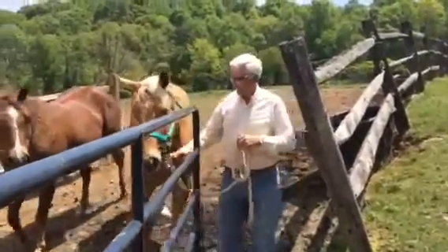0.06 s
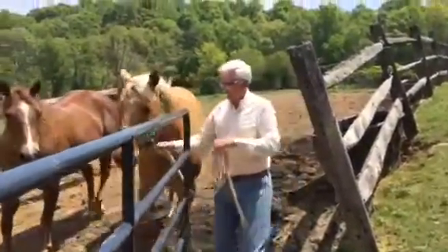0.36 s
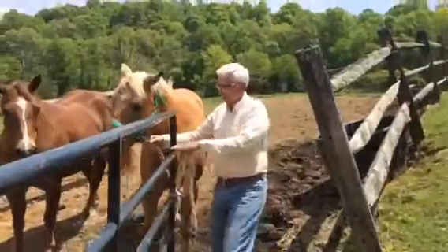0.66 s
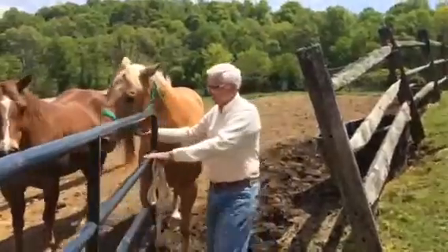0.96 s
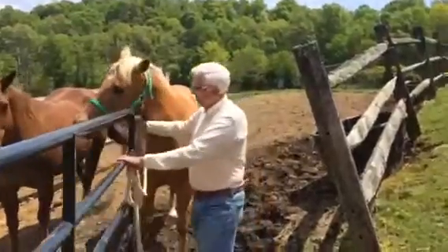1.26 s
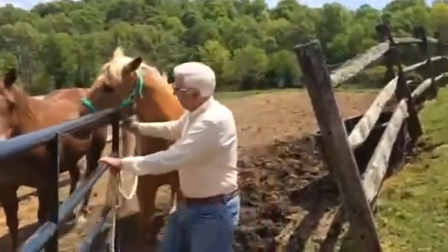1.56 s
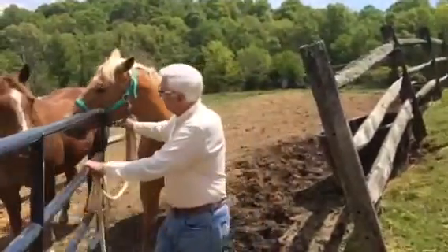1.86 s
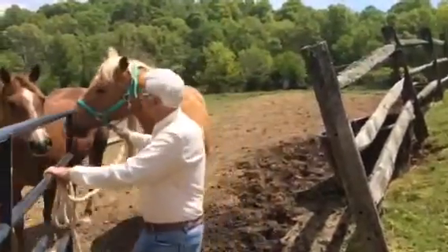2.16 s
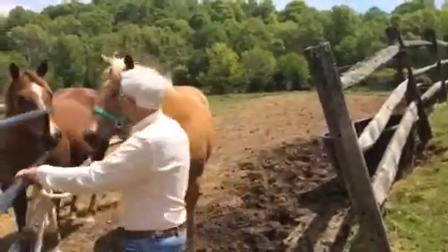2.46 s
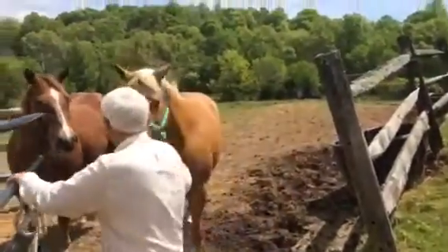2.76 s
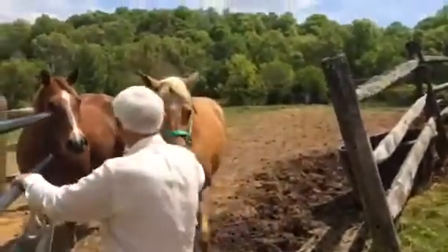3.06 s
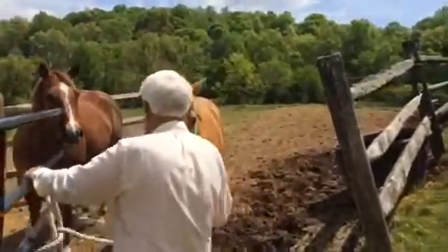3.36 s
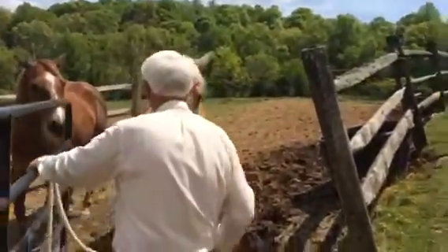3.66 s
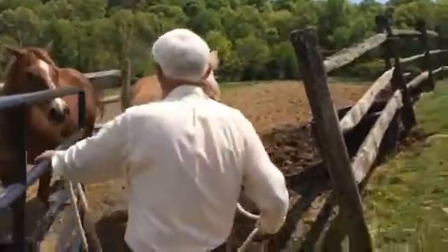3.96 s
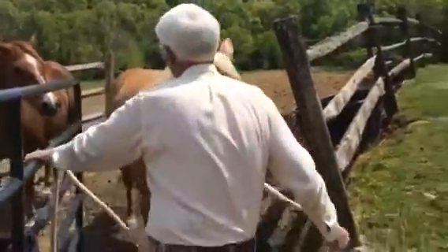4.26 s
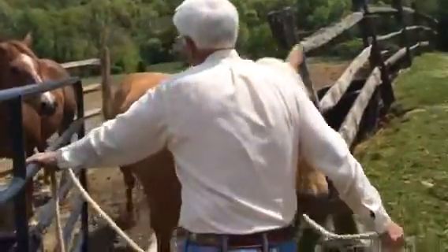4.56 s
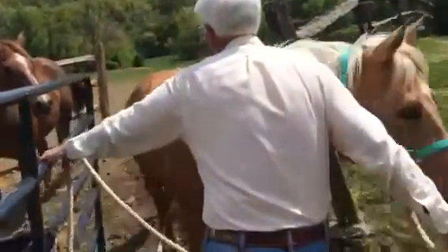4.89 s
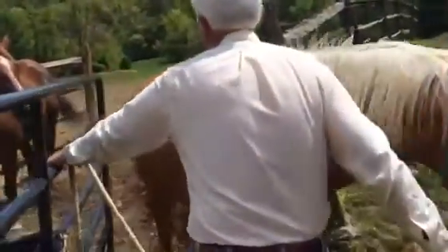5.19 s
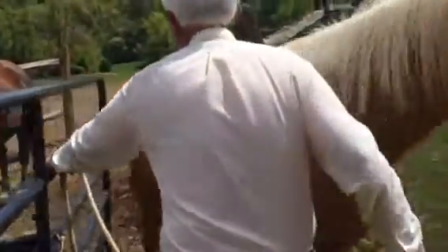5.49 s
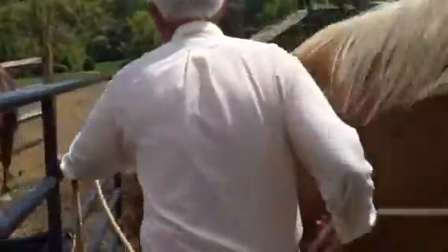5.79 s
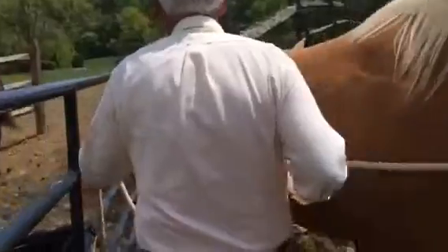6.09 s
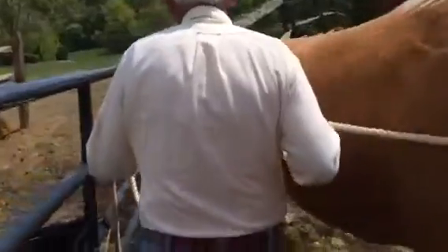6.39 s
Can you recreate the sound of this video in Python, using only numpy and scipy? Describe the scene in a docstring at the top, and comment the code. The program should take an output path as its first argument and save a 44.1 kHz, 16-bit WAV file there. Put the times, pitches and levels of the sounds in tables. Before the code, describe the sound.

A steel tube farm gate is handled close to the microphone in an open paddock. Thin chain clinks at the very start lead into a cluster of loud clangs from 0.3 to 0.5 seconds, each chattering briefly and leaving a hollow ring. Another cluster comes between 1.2 and 1.6 seconds, with a strong hit at 1.4. A sharp clang at 2.5 seconds starts a run of lighter knocks and rattles lasting until about 3.8. A double knock lands at 4.8, followed by small taps and ticks, then more clangs around 5.8 and light knocks near 6.2. Wind rumbles on the microphone over a soft field hiss, gusting around 0.2 and 1.2 seconds and easing later. Faint, dull hoof steps on dirt fall between 2 and 5.5 seconds. A distant bird whistles very faintly around 1 second, from 3.5 to 4.5, and at the end.

```python
"""Open paddock: a steel tube farm gate, swung by hand, knocks against its chain and fittings.
Each knock chatters briefly and rings the tubes: a dense crash, bands of wall modes, long frame tones.
Chain links clink, fittings tick, a far bird whistles and horses step softly on dirt.
Wind rumbles on the microphone over the rush and hiss of the field."""
import sys
import numpy as np
from scipy import signal
from scipy.fft import rfft, irfft
from scipy.io import wavfile

SR = 44100
rng = np.random.default_rng(int(sys.argv[2]) if len(sys.argv) > 2 else 0)


def write(x):
    x = np.atleast_2d(x).T
    wavfile.write(sys.argv[1], SR, np.round(np.clip(x, -1, 1) * 32767).astype(np.int16))


N = 292383
TIME_S = np.arange(N) / SR
CUTOFF_HZ = 15500

# breeze strength: time_s, level_db
BREEZE_LEVEL = [(0, -47.5), (.7, -52), (1.6, -43.5), (2.1, -49.5), (2.9, -47.5), (4.1, -51), (5.1, -55.5),
                (6.0, -58), (6.63, -62.5)]
# gusts on top of the breeze: crest_s, length_s, level_db
WIND_GUSTS = [(0.21, 0.16, -38.5), (0.968, 0.19, -41.5), (1.238, 0.33, -36), (3.994, 0.22, -48.5),
              (5.878, 0.5, -51.5)]
# wind rumble spectrum: freq_hz, density_db
RUMBLE_SPECTRUM = [(10, -48), (25, -19), (50, -0.5), (80, 4.5), (105, -1.5), (125, 5.5), (160, -5),
                   (210, -10.5), (320, -22), (600, -36), (1500, -89.5)]
# field rush spectrum: freq_hz, density_db
RUSH_SPECTRUM = [(200, 16), (400, 10.5), (800, 6.5), (1500, 6), (3000, 1), (5000, -8)]
# high hiss spectrum: freq_hz, density_db
HISS_SPECTRUM = [(1500, -9), (3000, -1.5), (4500, -1), (7000, 1.5), (10000, 3), (13000, 1.5), (15500, 1.5)]
# hiss strength: time_s, level_db
HISS_ENVELOPE = [(0, -49.5), (.7, -89), (1.05, -61), (1.8, -61), (2.3, -56.5), (3.5, -75), (4.1, -63.5),
                 (4.6, -58), (4.85, -60.5), (5.35, -57.5), (6.15, -68.5), (6.63, -70)]
# prominent frame tones: pitch_hz, level_db, t60_s
FRAME_MODES = [(254.4, -35, 4.4), (388.6, -35, 3.15), (562, -27.5, 2.2), (637.5, -24.5, 1.75),
               (719, -35.5, 1.5), (1000, -23, 2.6), (1054, -20.5, 2.6), (1095, -26.5, 2.1),
               (1130, -40, 1.4), (1113, -25.5, 2.2), (1186, -21, 2.1), (1350, -29, 2.6), (1425, -16, 1.38),
               (1591, -11, 0.92), (1676, -10, 0.61), (1768, -14, 0.63), (1875, -21.5, 0.36),
               (2004, -21, 0.67), (2155, -18, 0.37), (2258, -13, 0.79), (2410, -8, 0.17), (2613, -10, 0.26),
               (2920, -22.5, 1.46), (2987, -13.5, 0.5), (2940, -37, 0.41), (3400, -15, 0.3),
               (3366, -12.5, 0.38), (3400, -20.5, 0.26), (3430, -16, 0.23), (3583, -9, 0.41)]
# tube wall flexing in 2, 3, 4 .. lobes, one band each: lowest_hz, level_db, t60_s
WALL_BANDS = [(1047, -15.5, 2.7), (2929, -4, 0.93), (5560, -5.5, 0.57), (9190, -13.5, 0.31),
              (12100, -25, 0.19)]
# crash spectrum of all welded parts: freq_hz, density_db
CRASH_SPECTRUM = [(150, -18), (260, 0), (430, -11), (620, -5), (820, -1.5), (1100, 6), (1600, 9.5),
                  (2600, 5.5), (4300, 6), (7000, 1), (10000, -26.5), (12500, -16.5), (15500, -4.5)]
# crash decay: freq_hz, t60_s
CRASH_DECAY = [(200, 0.62), (600, 0.64), (1500, 0.41), (3500, 0.37), (6000, 0.2), (10000, 0.41),
               (15000, 0.084)]
# knocks on the gate: start_s, level_db, treble_db, contact_hz, chatter_s
GATE_KNOCKS = [(.252, -20, 6, 5900, 0.0091), (0.329, -21, 4, 5800, 0.0095), (.363, -17, 3.5, 2820, .024),
               (.495, -23.5, 2, 3129, .005), (1.246, -32.5, 5, 1910, 0.0089),
               (1.268, -30.5, 4, 3860, 0.022), (1.356, -40, 9, 3250, .011), (1.419, -34.5, -9, 2260, 0.013),
               (1.428, -16, 4, 2140, 0.017), (1.474, -32, 16, 4480, 0.016), (1.571, -27, 7, 6460, .01),
               (2.446, -32, -1, 6650, 0.007), (2.48, -25.5, 7, 3550, .011), (2.508, -16.5, 1.5, 1440, .009),
               (2.737, -37.5, -2, 3146, 0.018), (2.826, -25, 5, 3300, 0.037),
               (2.931, -24.5, 1.5, 1610, .011), (3.001, -31, 2.5, 3000, 0.011),
               (3.101, -34.5, 1, 2970, 0.015), (3.158, -25, 4.5, 6600, 0.0074), (3.213, -28, 6, 3560, .014),
               (3.261, -32, 7.5, 5960, .012), (3.327, -39, 6, 1720, .015), (3.637, -33, 4, 2350, .012),
               (3.826, -26, 9.5, 2950, 0.013), (4.837, -23.5, 0, 1900, 0.014),
               (4.849, -21.5, 6.5, 3270, 0.027), (5.027, -41, -2.5, 6400, 0.01),
               (5.07, -45, -5, 6450, 0.02), (5.13, -42, 4, 3960, 0.01), (5.141, -30.5, 3.5, 4740, 0.013),
               (5.772, -24, 5, 3150, 0.0079), (5.795, -22, 2, 3160, .021), (5.864, -19, -3, 1930, 0.018),
               (6.013, -37, 4, 3050, 0.006), (6.231, -31.5, 2, 3270, .017), (6.309, -41, 8, 3420, 0.019)]
# chain link modes, close pairs beat: pitch_hz, level_db, t60_s
LINK_MODES = [(9000, -10, 0.043), (11760, -14.5, .25), (12300, -2.5, 0.47), (12100, -11, 0.33),
              (13404, -0.5, .25), (13432, -15, 0.3), (14450, -6, 0.24), (14900, -17, 0.19)]
# link clinks: start_s, level_db
LINK_CLINKS = [(0.026, -44), (.168, -29.5)]
# ticks and scuffs of latch, rope and halter: start_s, level_db, resonance_hz, t60_s
FITTING_TICKS = [(.024, -19.5, 11900, 0.018), (0.169, -32, 11700, 0.022), (2.204, -35, 7100, 0.014),
                 (2.312, -53, 2050, 0.03), (2.78, -36, 4940, 0.051), (3.601, -39, 4500, 0.015),
                 (4.744, -46.5, 3020, 0.095), (5.374, -37.5, 6700, 0.056), (5.647, -40, 5600, 0.016),
                 (5.708, -30.5, 5340, 0.021), (5.748, -32, 4470, 0.025)]
# far bird: start_s, length_s, start_hz, end_hz, level_db
BIRD_WHISTLES = [(0.750, 0.095, 2490, 2980, -60), (0.936, .12, 1970, 2200, -61),
                 (3.5, 0.118, 2420, 2700, -63), (4.085, 0.075, 2520, 2710, -58),
                 (4.153, 0.19, 2420, 2660, -62), (4.43, 0.07, 2600, 2280, -68),
                 (4.515, 0.085, 2310, 2590, -59), (6.461, 0.05, 2520, 2730, -58)]
# hoof falls on dirt: start_s, level_db, resonance_hz
HOOF_FALLS = [(2.128, -60, 600), (2.272, -50.5, 694), (2.755, -37, 700), (4.264, -49, 255),
              (4.525, -49.5, 640), (4.765, -50.5, 457), (5.376, -44.5, 910)]


def from_db(db):
    """Decibels to gain."""
    return 10 ** (np.asarray(db) / 20)


def unit_rms(x):
    """Scale to rms 1."""
    return x / np.sqrt(np.mean(x ** 2) + 1e-20)


def in_time(curve):
    """Read a curve at every sample."""
    return np.interp(TIME_S, *np.transpose(curve))


def at_hz(curve, hz):
    """Read a curve along log frequency."""
    freq_hz, value = np.transpose(curve)
    return np.interp(np.log(np.maximum(hz, 1)), np.log(freq_hz), value)


def add(out, start_s, sound):
    """Mix in at start_s, which may be negative."""
    start = round(start_s * SR)
    part = sound[max(-start, 0):max(N - start, 0)]
    out[max(start, 0):max(start, 0) + len(part)] += part


def decay(t60_s, samples):
    """Envelope falling 60 dB in t60_s."""
    return np.exp(-np.log(1000) * np.arange(samples) / SR / t60_s)


def swell(sound, rise_s):
    """Soften the onset, time constant rise_s."""
    return sound * (1 - np.exp(-np.arange(len(sound)) / SR / rise_s))


def noise(spectrum):
    """Coloured noise, rms 1."""
    hz = np.arange(N // 2 + 1) * SR / N
    white = rfft(rng.standard_normal(N))
    return unit_rms(irfft(white * from_db(at_hz(spectrum, hz)), N))


def eddies(rate_hz, step=40):
    """Slow random swing of turbulent air, rms 1."""
    pole = np.exp(-2 * np.pi * rate_hz * step / SR)
    points = N // step + 1
    slow = signal.lfilter([1], [1, -2 * pole, pole * pole], rng.standard_normal(2 * points))[points:]
    return np.interp(np.arange(N) / step, np.arange(points), unit_rms(slow))


def air(eddy_db=3, eddy_hz=13, rush_db=-60, rush_follow=0.083):
    """Breeze and gusts rumble on the microphone, shaken by eddies, over a soft rush and hiss."""
    breeze_db = in_time(BREEZE_LEVEL)
    wind = from_db(breeze_db)
    for crest_s, length_s, level_db in WIND_GUSTS:
        add(wind, crest_s - length_s / 2, from_db(level_db) * np.hanning(int(length_s * SR)))
    rumble = wind * from_db(eddy_db * eddies(eddy_hz)) * noise(RUMBLE_SPECTRUM)
    rush = from_db(rush_db + rush_follow * (breeze_db - breeze_db.mean())) * noise(RUSH_SPECTRUM)
    hiss = from_db(in_time(HISS_ENVELOPE)) * noise(HISS_SPECTRUM)
    return rumble + rush + hiss


def resonator(hz, t60_s, size=330):
    """Damped modes: returns a function from complex strengths to size * size samples of ringing."""
    pole = (2j * np.pi * hz - np.log(1000) / t60_s) / SR
    steps = np.arange(size)
    # damped sine = state at block start * course within the block
    course = np.exp(np.outer(pole, steps)).astype(np.complex64)
    state = np.exp(np.outer(steps * size, pole))
    return lambda strength: ((state * strength + 1e-15).astype(np.complex64) @ course).imag.ravel()


def tube_modes(spread=0.4, crowding=1.35, fall_db=14, damping=0.98, count=56):
    """Frame tones, plus wall modes that thin out and die sooner up each band: hz, gain, t60_s."""
    hz, db, t60_s = np.transpose(FRAME_MODES)
    modes = [(hz, from_db(db), t60_s)]
    for lowest_hz, level_db, longest_s in WALL_BANDS:
        position = ((np.arange(count) + rng.random(count)) / count) ** crowding
        shape = unit_rms(from_db(-fall_db * position)) / np.sqrt(count)
        width_hz = spread * np.sqrt(lowest_hz * WALL_BANDS[1][0])
        wall_t60_s = longest_s / (1 + damping * position)
        modes.append((lowest_hz + width_hz * position, from_db(level_db) * shape, wall_t60_s))
    return np.hstack(modes)


def crash_modes(level_db=3, scatter=0.077, count=1500):
    """Short, unevenly spaced modes of the welded parts, too dense to tell apart: hz, gain, t60_s."""
    hz = np.linspace(np.sqrt(CRASH_SPECTRUM[0][0]), np.sqrt(CUTOFF_HZ), count) ** 2
    spacing_hz = np.gradient(hz)
    hz = hz + spacing_hz * rng.uniform(-0.46, 0.45, count)
    shape = unit_rms(from_db(at_hz(CRASH_SPECTRUM, hz)) * np.sqrt(spacing_hz)) / np.sqrt(count)
    t60_s = at_hz(CRASH_DECAY, hz) * np.exp(scatter * rng.standard_normal(count))
    return hz, from_db(level_db) * shape, t60_s


def blow(hz, bass_db, treble_db, contact_hz, contact_db, width_octaves=0.2, spot_db=1.5):
    """Complex mode strengths: each knock lands on another spot and shares its force differently."""
    colour_db = at_hz([(1400, bass_db), (3800, 0), (9000, treble_db)], hz)
    colour_db += contact_db * np.exp(-0.5 * (np.log2(hz / contact_hz) / width_octaves) ** 2)
    colour_db += spot_db * rng.standard_normal(len(hz))
    return from_db(colour_db) * np.exp(2j * np.pi * rng.random(len(hz)))


def crack(centre_hz, t60_s, samples=8192):
    """Decaying contact noise around one octave-wide resonance."""
    band_hz = np.clip([centre_hz / np.sqrt(2), centre_hz * np.sqrt(2)], 20, SR / 2 - 1000)
    bandpass = signal.butter(2, band_hz, "band", fs=SR, output="sos")
    burst = signal.sosfilt(bandpass, rng.standard_normal(samples))
    return unit_rms(burst) * decay(t60_s, samples)


def chatter(length_s, bounce=0.51, count=14):
    """One contact and its ever weaker rebounds, unit energy."""
    position = (np.arange(count) + rng.random(count)) / count
    samples = max(int(length_s * SR), 2)
    contacts = np.zeros(samples + 1)
    contacts[(position * samples).astype(int)] = bounce * np.exp(-position) * rng.choice([-1, 1], count)
    contacts[0] = 1
    return contacts / np.linalg.norm(contacts)


def gate(ring_db=-4, crack_db=-5, rattle_db=-10, grip_from_s=1.0, grip_db_per_s=13, linger_age_s=0.5):
    """Each knock gives a long ring, a dense crash and a crack, and rattles the loose chain links."""
    tube_hz, tube_gain, tube_t60_s = tube_modes()
    crash_hz, crash_gain, crash_t60_s = crash_modes()
    tubes = resonator(tube_hz, tube_t60_s)
    crash = resonator(crash_hz, crash_t60_s, size=150)
    out = np.zeros(N)
    # tubes still ringing from an earlier swing
    earlier_blow = blow(tube_hz, bass_db=-8, treble_db=31, contact_hz=WALL_BANDS[0][0], contact_db=4.5)
    add(out, -linger_age_s, from_db(-1) * tubes(tube_gain * earlier_blow))
    for start_s, level_db, treble_db, contact_hz, chatter_s in GATE_KNOCKS:
        bass_db = -2.5 - 0.13 * (level_db + 25)  # harder knock: shorter contact, less bass
        contact_db = 4.5 - np.log2(contact_hz / 3200)  # heavy parts resonate lower and stand out more
        colour = bass_db, treble_db, contact_hz, contact_db
        clang = from_db(ring_db) * tubes(tube_gain * blow(tube_hz, *colour))
        if start_s > grip_from_s:  # a hand on the rail damps the long tones
            clang *= from_db(-grip_db_per_s * TIME_S[:len(clang)])
        add(clang, 0, crash(crash_gain * blow(crash_hz, *colour)))
        add(clang, 0, from_db(crack_db + treble_db) * crack(centre_hz=7500, t60_s=0.14))
        clang = swell(clang, rise_s=0.0009)  # the blow spreads along the tubes
        add(out, start_s, from_db(level_db) * signal.oaconvolve(clang, chatter(chatter_s)))
        link_hit = crack(centre_hz=11000, t60_s=0.061)
        rattle = signal.fftconvolve(link_hit, chatter(length_s=0.079, count=5))
        add(out, start_s, from_db(level_db + rattle_db) * rattle)
    return out


def chain_and_fittings(rise_share=0.1):
    """Small links ring high and thin; fittings only tick, and longer scuffs start more softly."""
    hz, mode_db, link_t60_s = np.transpose(LINK_MODES)
    link = resonator(hz, link_t60_s)
    out = np.zeros(N)
    for start_s, level_db in LINK_CLINKS:
        add(out, start_s, link(from_db(mode_db + level_db)))
    for start_s, level_db, resonance_hz, t60_s in FITTING_TICKS:
        add(out, start_s, from_db(level_db) * swell(crack(resonance_hz, t60_s), rise_share * t60_s))
    return out


def bird(echo_t60_s=0.47, echo_samples=8192):
    """Gliding whistles, smeared by echoes from the trees."""
    out = np.zeros(N)
    for start_s, length_s, start_hz, end_hz, level_db in BIRD_WHISTLES:
        pitch_hz = np.linspace(start_hz, end_hz, int(length_s * SR))
        tone = np.sin(2 * np.pi * np.cumsum(pitch_hz) / SR)
        add(out, start_s, from_db(level_db) * np.hanning(len(tone)) * tone)
    echoes = rng.standard_normal(echo_samples) * decay(echo_t60_s, echo_samples)
    return out + signal.fftconvolve(out, echoes / np.linalg.norm(echoes))[:N]


def hooves(thud_t60_s=0.12, sink_s=0.003):
    """Each hoof sinks into soft ground with a dull puff."""
    out = np.zeros(N)
    for start_s, level_db, resonance_hz in HOOF_FALLS:
        add(out, start_s, from_db(level_db) * swell(crack(resonance_hz, thud_t60_s), sink_s))
    return out


def scene():
    """Gate and chain close by, horses and open field around them; mono."""
    return (gate() + chain_and_fittings() + hooves() + bird() + air())[None]


def record(dry):
    """Steep low-pass at CUTOFF_HZ."""
    return signal.sosfilt(signal.ellip(12, 0.2, 80, CUTOFF_HZ, fs=SR, output="sos"), dry)


dry = scene()
out = record(dry)
write(out)
```